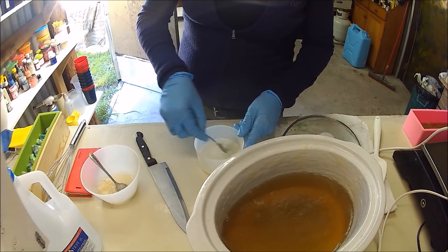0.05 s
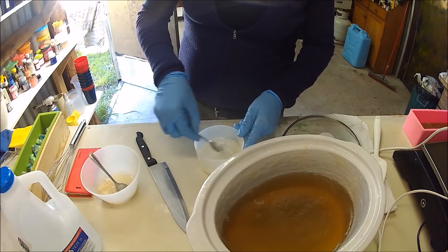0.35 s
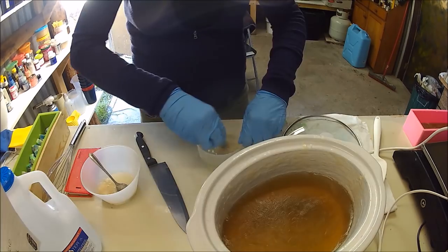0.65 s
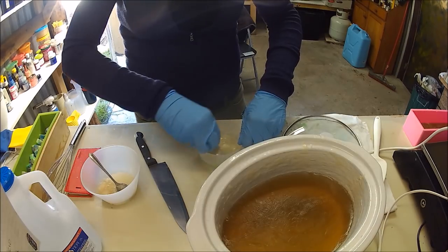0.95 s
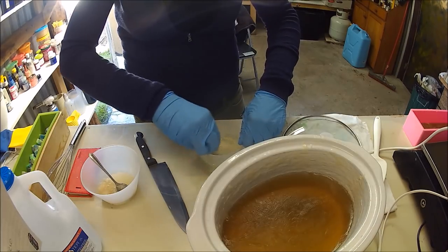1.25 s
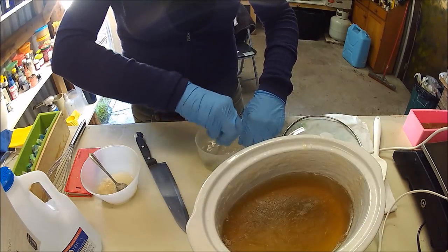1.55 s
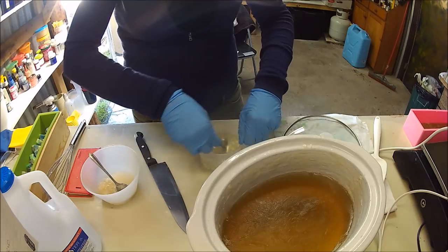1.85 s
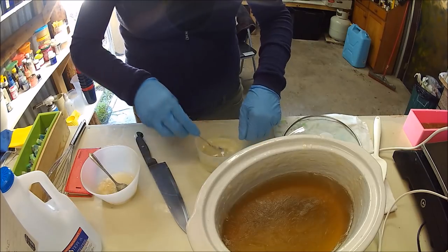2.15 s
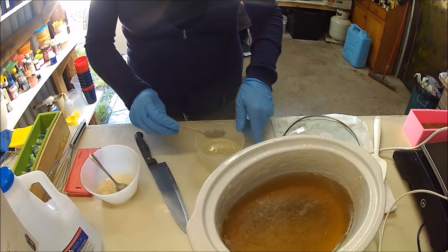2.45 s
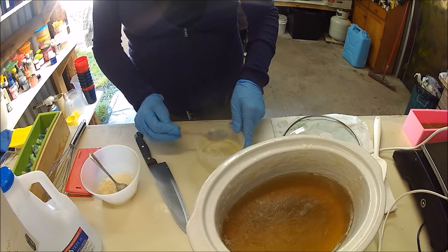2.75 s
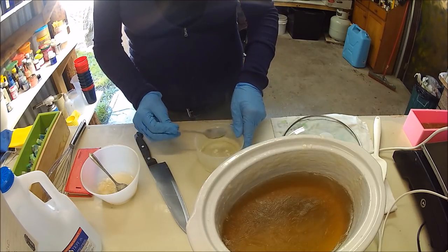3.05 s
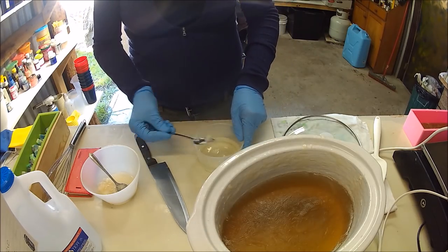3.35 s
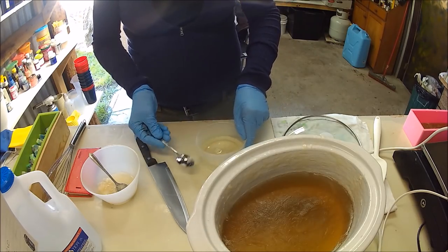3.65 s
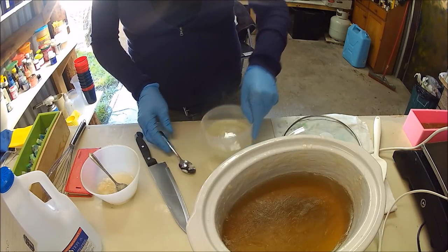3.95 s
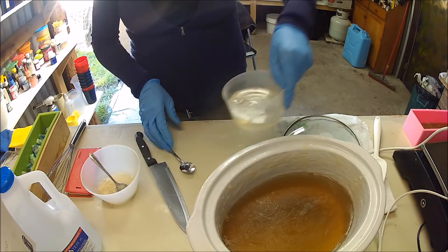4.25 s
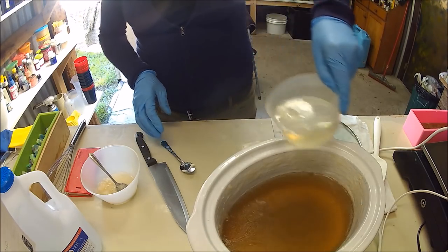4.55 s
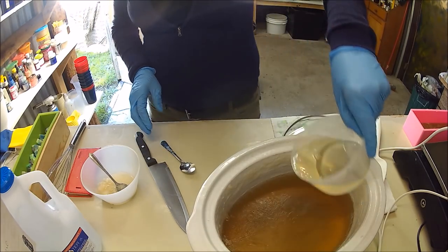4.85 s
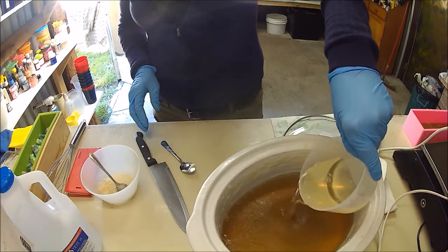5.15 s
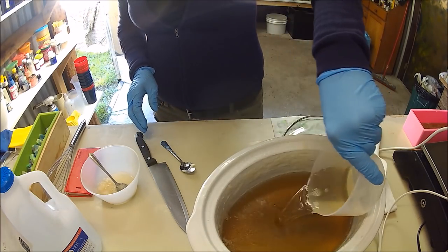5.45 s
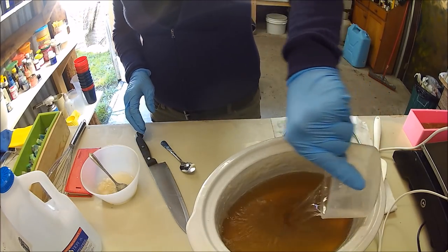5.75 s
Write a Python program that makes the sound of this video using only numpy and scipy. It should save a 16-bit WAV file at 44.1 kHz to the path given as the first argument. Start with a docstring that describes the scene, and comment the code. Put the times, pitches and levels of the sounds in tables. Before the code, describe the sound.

In a garage, soft irregular ticks and scrapes come from a metal spoon stirring liquid in a plastic cup. Three sharp, evenly spaced taps on the cup follow, each ringing briefly, and then two clacks as the spoon is set down on the bench. Near the end, a few quiet drips fall into a pot. The sound is slightly muffled, as from a small microphone, with constant hiss and a faint hum.

```python
"""A metal spoon stirs liquid in a small plastic cup on a garage workbench.
It scuffs the wall in stick-slip, shaking the cup's modes; droplets splash and trap ringing bubbles.
The spoon is tapped off three times and laid down with two clacks; the cup empties into a pot
in a few soft drips. A small, dull microphone hears it over steady hiss, faint mains hum
and a thin electronic whine."""
import sys
import numpy as np
from scipy import signal
from scipy.fft import rfft, irfft
from scipy.io import wavfile
from scipy.ndimage import uniform_filter1d

SR = 44100
rng = np.random.default_rng(int(sys.argv[2]) if len(sys.argv) > 2 else 0)


def dump_mix(stems):
    """Bounce the given channels to the path in sys.argv[1] as a 16-bit WAV at rate SR."""
    frames = np.atleast_2d(stems).T  # one column per channel
    limited = np.clip(frames, -1, 1)  # hard clip at full scale
    pcm = np.round(limited * 32767).astype(np.int16)
    wavfile.write(sys.argv[1], SR, pcm)


N = 264546
AGE_S = np.arange(SR * 2 // 5) / SR  # time axis of one event

# spoon on cup wall, spectrum: f/Hz, level/dB
SCUFF_SPECTRUM = [(70, -30), (160, -1), (330, -10.5), (700, -6), (1000, -9), (1400, 8.5), (1900, -7.5),
                  (2800, -2.5), (3800, -16), (5500, -62.5)]
# modes of the cup on the bench: f/Hz, level/dB, t60/s
CUP_MODES = [(172.6, -12.5, 0.34), (302.5, -5.5, 0.18), (338.2, -2.5, 0.21), (530.5, -0.5, 0.22),
             (697, -11.5, 0.099), (802, -0.5, 0.16), (896, -6, 0.18), (1077, -5, 0.22), (1230, -6.5, 0.26),
             (1311, 6.5, 0.16), (1413, -7.5, 0.3), (1495, 8, 0.14), (1542, -6, .15), (1730, 4.5, 0.095),
             (1790, -14.5, 0.06), (1997, -8, 0.18), (2015, -14.5, 0.31), (2140, -11.5, 0.26),
             (2500, -14, 0.14), (2540, -8, 0.11), (2730, -6, 0.11)]


def undb(db):
    """Decibels to gain."""
    return 10 ** (np.asarray(db) / 20)


def unit(x):
    """Scale to unit energy."""
    return x / np.sqrt(np.sum(x ** 2))


def fade(t60_s):
    """Exponential decay, 60 dB in t60_s."""
    return np.exp(-np.log(1000) * AGE_S / t60_s)


def through(x, response):
    """Convolve, keeping the length of x."""
    return signal.fftconvolve(x, response)[:len(x)]


def colour(x, points):
    """Minimum-phase filter; points: f/Hz, level/dB."""
    size = 4096
    hz, db = np.transpose(points)
    bins_hz = np.maximum(np.fft.rfftfreq(size, 1 / SR), 1)
    gain = undb(np.interp(np.log(bins_hz), np.log(hz), db))
    cepstrum = irfft(np.log(gain))
    cepstrum[1:size // 2] *= 2
    cepstrum[size // 2 + 1:] = 0
    return through(x, irfft(np.exp(rfft(cepstrum))))


def even(x):
    """Flatten an event's spectrum, keeping its fine ripple."""
    spectrum = rfft(x)
    local_rms = np.sqrt(uniform_filter1d(abs(spectrum) ** 2, size=110))
    flat = irfft(spectrum / local_rms, len(AGE_S))
    return unit(flat * (AGE_S < AGE_S[-1] * 0.8))  # cut the wrapped tail


def delayed(x, delay_s):
    """Delay an event."""
    return np.interp(AGE_S - delay_s, AGE_S, x, left=0)


def add(out, t_s, x, db):
    """Mix in an event; db is its rms if packed into 20 ms."""
    start = int(t_s * SR)
    x = unit(x)[:len(out) - start]
    out[start:start + len(x)] += x * undb(db) * np.sqrt(SR * 0.02)


def scatter(t60_s):
    """Dense, decaying reflections."""
    return even(rng.standard_normal(len(AGE_S)) * fade(t60_s))


def contact(near_db=10, near_t60_s=0.041):
    """An impulse plus early reflections from the bench and the things on it."""
    return unit((AGE_S == 0) + undb(near_db) * scatter(near_t60_s))


def mode(hz, t60_s, rise_cycles=1.6):
    """One damped vibration with a soft onset."""
    rise = np.sin(np.pi / 2 * np.minimum(AGE_S * hz / rise_cycles, 1)) ** 2
    return np.sin(2 * np.pi * hz * AGE_S) * fade(t60_s) * rise


def ringing(modes, spread_db=1):
    """Sum of modes; level and sign vary with the point of contact."""
    draws = rng.standard_normal((len(modes), 2))
    return unit(sum(undb(db + spread_db * size) * np.sign(side) * mode(hz, t60_s)
                    for (hz, db, t60_s), (size, side) in zip(modes, draws)))


def impulses(count, per_s):
    """Randomly timed impulses of random size and sign, over count samples."""
    chance, size = rng.random((count, 2)).T
    return (chance < per_s / SR) * (2 * size - 1)


def slips(drag_s, touch=1.8):
    """Stick-slip: a first touch, then small catches while the spoon drags."""
    catches = impulses(len(AGE_S), per_s=900) * (AGE_S < drag_s)
    return even(catches + touch * (AGE_S == 0))


def stirring(modes_db=-6, room_db=-6, slide_s=0.041, slide_db=-9.5):
    """Each scuff shakes the liquid-damped cup and trails off in a faint, thin slide."""
    # about two wall contacts a turn, last a finger taking hold: t/s, level/dB, drag/s
    scuffs = [(.002, -54, 0.011), (0.125, -47, 0.011), (0.201, -48.5, 0.011), (0.267, -48.5, .004),
              (.276, -51, 0.011), (0.442, -52, 0.019), (0.474, -51.5, 0.025), (.531, -47.5, 0.013),
              (0.65, -48, 0.021), (.681, -55.5, 0.0088), (0.84, -46.5, 0.0078), (.850, -47, 0.011),
              (0.897, -47, 0.0055), (1.016, -58.5, .012), (1.102, -49, 0.0052), (1.113, -47, .003),
              (1.159, -46, .005), (1.341, -45.5, 0.041), (1.412, -51.5, 0.015), (1.529, -50, 0.029),
              (1.589, -41.5, 0.0037), (1.854, -50.5, 0.015), (4.099, -51, 0.011)]
    out = np.zeros(N)
    for t_s, db, drag_s in scuffs:
        touch = contact(near_db=9, near_t60_s=0.024) + undb(room_db) * scatter(t60_s=0.17)
        wall = unit(colour(even(touch), SCUFF_SPECTRUM))
        cup = wall + undb(modes_db) * ringing(CUP_MODES)
        scuff = through(slips(drag_s), cup)
        slide = through(slips(slide_s, touch=0), cup)
        treble_db = -4.5 + 0.05 * (db + 45)  # firmer is slightly brighter
        add(out, t_s, colour(scuff, [(600, 0), (1400, 0.0018), (2900, treble_db)]), db)
        add(out, t_s + drag_s, colour(slide, [(600, -7), (1400, 0), (2900, -0.5)]), db + slide_db)
    return out


def swirl(start_db=-60, fade_from_s=0.83, stop_s=3.5):
    """Tiny laps and grazes between the scuffs, dying away as the stirring stops."""
    laps = colour(impulses(N, per_s=120), SCUFF_SPECTRUM)
    sound = through(laps, contact(near_db=4.5, near_t60_s=0.11))
    envelope = np.interp(np.arange(N) / SR, [fade_from_s, stop_s], [1, 0])
    return undb(start_db) * sound / sound.std() * envelope


def background(air_db=-56, hiss_db=-82):
    """Steady dull noise and high hiss, with slightly wavering mains hum and electronic whine."""
    # noise spectra: f/Hz, level/dB
    air_spectrum = [(15, -53.5), (25, -2.5), (102, -8.5), (124, -14.5), (219, -18), (244, -10),
                    (272, -15.5), (297, -15), (654, -15.5), (730, -10), (889, -15), (1110, -5.5),
                    (2090, -4), (2840, -6), (4700, -27), (6110, -50.5), (10300, -120)]
    hiss_spectrum = [(5000, -23), (6000, -19.5), (6900, 3.5), (8000, -11.5), (9000, 4.5), (10500, 9),
                     (12000, 12), (15500, 3)]
    # hum and whine: f/Hz, level/dB, relative phase diffusion
    tones = [(101.4, -72.5, 1.5), (11820, -89, 6), (11890, -87.5, 11)]
    air = colour(rng.standard_normal(N), list(air_spectrum) + [(6500, -80.0)])  # flat above 6.5 kHz
    hiss = colour(rng.standard_normal(N), hiss_spectrum)
    out = undb(air_db) * air / air.std() + undb(hiss_db) * hiss / hiss.std()
    for hz, db, diffusion in tones:
        step_rad = 0.45 * np.sqrt(2 * np.pi * diffusion / SR)
        drift_rad = step_rad * np.cumsum(rng.standard_normal(N))
        out += undb(db) * np.sqrt(2) * np.sin(2 * np.pi * hz * np.arange(N) / SR + drift_rad)
    return out


def drips(t60_cycles=70, rise_per_s=2.8, room_db=-7):
    """Each drop splashes and traps a bubble whose pitch rises; small bubbles die sooner."""
    # drops behind the spoon, later in the pot: t/s, level/dB, bubble f/Hz, splash/dB
    drops = [(.363, -52.5, 1704, -10), (.432, -58.5, 3040, -4), (.632, -53.5, 2850, -16),
             (1.982, -51.5, 2480, -1), (5.668, -54.5, 1470, -9), (5.867, -50.5, 758, 6),
             (5.951, -56, 654, 2), (5.994, -57, 1590, -10)]
    # f/Hz, level/dB
    splash_spectrum = [(300, -22), (800, -1), (1500, 4.5), (3000, -1), (4500, -19), (6000, -40)]
    out = np.zeros(N)
    for t_s, db, hz, splash_db in drops:
        bubble = unit(mode(hz * (1 + rise_per_s * AGE_S / 2), t60_cycles / hz))
        splash = unit(colour(contact(near_db=17, near_t60_s=0.051), splash_spectrum))
        room = (AGE_S == 0) + undb(room_db) * scatter(t60_s=0.16)
        add(out, t_s, through(bubble + undb(splash_db) * splash, room), db)
    return out


def knocks(blows, modes, spectrum, radiation, room_t60_s, room_db, echo_db):
    """Hard blows: a crack with two rebounds, one short ring, the modes and the garage."""
    room_rise_s, wall_echo_s = 0.013, 0.027
    bite_db, bite_ratio = 3.5, 1.22
    out = np.zeros(N)
    for t_s, db, ring_hz, ring_db, modes_db, rebound_s, rebound_db, hard_db, bite_hz in blows:
        rattle = sum(undb(k * rebound_db) * delayed(contact(), k * rebound_s) for k in range(3))
        direct = even(rattle) * np.linalg.norm(rattle)
        room = unit(scatter(room_t60_s) * (1 - np.exp(-AGE_S / room_rise_s)))
        room = colour(room, [(1500, 0), (4400, -5), (9000, -10)])  # clutter absorbs treble
        echo = delayed(contact(), wall_echo_s)
        echo = colour(echo, [(200, 1.5), (350, 5), (900, -0.5), (3000, -8), (6000, -16.5)])
        crack = unit(colour(direct + undb(room_db) * room + undb(echo_db) * echo, spectrum))
        ring = unit(mode(ring_hz, t60_s=0.1))
        sound = crack + undb(ring_db) * ring + undb(modes_db) * ringing(modes)
        # harder contact: more treble, less bass
        hardness = [(750, -0.22 * hard_db), (1400, 0.00069), (2600, 0.11 * hard_db),
                    (3900, hard_db), (6500, 0.55 * hard_db)]
        # each point of contact favours one band
        bite = [(bite_hz / bite_ratio, 0), (bite_hz, bite_db), (bite_hz * bite_ratio, 0)]
        for curve in (radiation, hardness, bite):
            sound = colour(sound, curve)
        add(out, t_s, sound, db)
    return out


def taps():
    """The spoon is tapped off on the cup, which rings."""
    # t/s, level/dB, ring f/Hz, ring/dB, modes/dB, rebound/s, rebound/dB, hardness/dB, bite f/Hz
    blows = [ (2.7075, -24.5, 1430, -14, -1, 0.0165, -4, -3.5, 2650),
             (2.9472, -21.5, 1490, -13, -2, .0092, -6.5, 2, 1810),
             (3.1817, -22, 1330, -3.5, -1.5, .005, -3, 3.5, 2650)]
    # f/Hz, level/dB
    crack_spectrum = [(35, -38.5), (70, -11), (150, -13.5), (320, -4), (450, -4.5), (800, -3), (1050, -4.5),
                      (1400, 2.5), (1750, -1), (2100, -7), (2700, -7.5), (3300, -12.5), (4100, -21.5),
                      (5000, -39.5), (6000, -57), (14000, -65)]
    cup_radiation = [(210, 0.5), (320, 4), (650, -1.2), (1400, -1.9), (1950, -1), (2600, -0.1),
                     (3900, -3.5)]
    return knocks(blows, CUP_MODES, crack_spectrum, cup_radiation,
                  room_t60_s=0.31, room_db=-6, echo_db=-7.5)


def clacks():
    """The spoon's bowl, then its handle, meet the bench; the spoon rings."""
    # t/s, level/dB, ring f/Hz, ring/dB, modes/dB, rebound/s, rebound/dB, hardness/dB, bite f/Hz
    blows = [ (3.9222, -23, 1345, -6.5, -8.5, .0045, -3.5, -13, 2870),
             (4.1712, -23, 1270, -8, 0.5, 0.0066, -10.5, 11, 2450)]
    # f/Hz, level/dB, t60/s
    spoon_modes = [(313.7, -4.5, 0.2), (694, -2, 0.13), (783, -13.5, 0.28), (972, -10.5, 0.25),
                   (1135, -6, 0.23), (1326, 2, 0.15), (1373, -6.5, 0.12), (1452, 3.5, 0.17),
                   (2160, -10.5, 0.23), (2440, -1.5, 0.082), (2500, -16, 0.1), (2740, -27, 0.13),
                   (3110, -12.5, 0.13), (3710, -16.5, 0.12), (3800, -19, 0.1), (4000, -18, 0.065),
                   (4400, -27, 0.14)]
    # f/Hz, level/dB
    crack_spectrum = [(60, -28), (150, -15), (320, -2.5), (500, -4.5), (750, -4.5), (1000, -5.5),
                      (1350, 3.5), (1900, -7), (2700, -8), (3350, -15.5), (3750, -14.5), (4400, -27),
                      (5100, -38), (6000, -57.5), (14000, -56.5)]
    bench_radiation = [(300, -11), (750, -3.5), (1400, 0), (1950, -6), (2600, 0), (3900, -2)]
    return knocks(blows, spoon_modes, crack_spectrum, bench_radiation,
                  room_t60_s=0.28, room_db=-5.5, echo_db=-14)


def scene():
    """Everything at the bench, mono."""
    return (taps() + clacks() + stirring() + swirl() + drips() + background())[None]


def record(dry):
    """Steep low-pass at 15.7 kHz."""
    return signal.sosfilt(signal.ellip(8, 0.2, 70, 15700, fs=SR, output="sos"), dry)


dry = scene()
out = record(dry)
dump_mix(out)
```